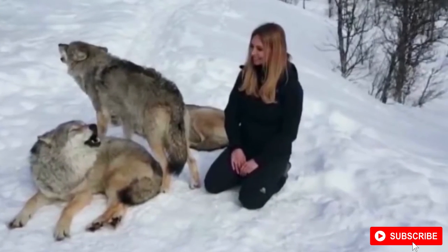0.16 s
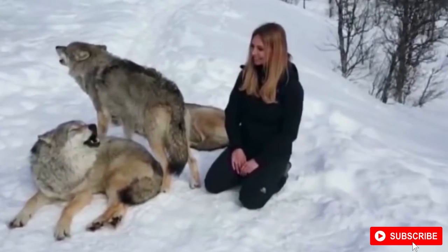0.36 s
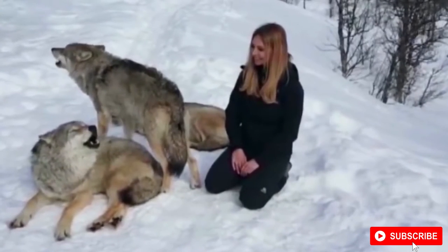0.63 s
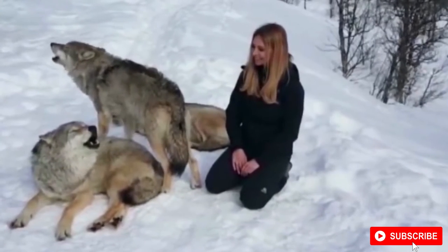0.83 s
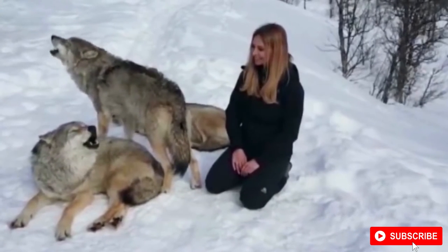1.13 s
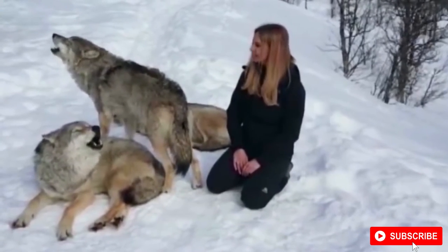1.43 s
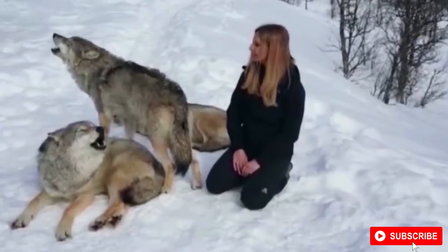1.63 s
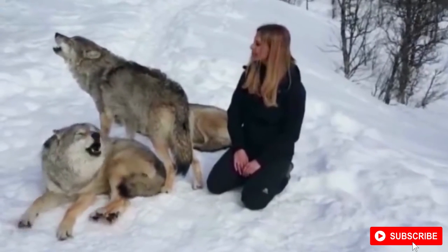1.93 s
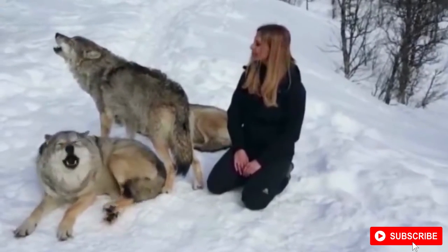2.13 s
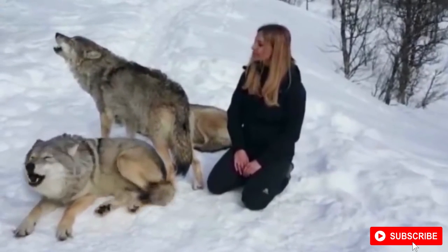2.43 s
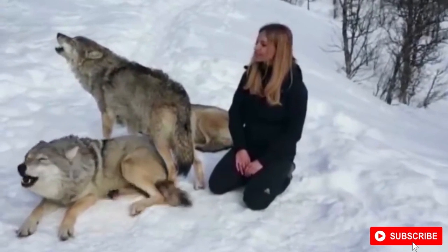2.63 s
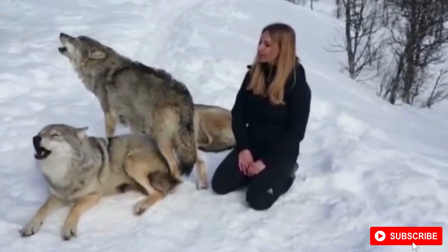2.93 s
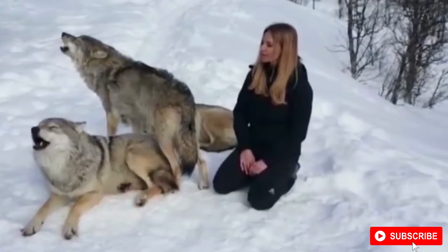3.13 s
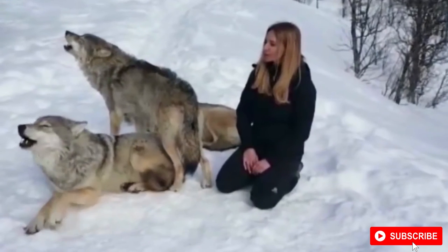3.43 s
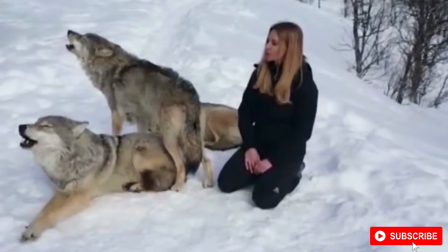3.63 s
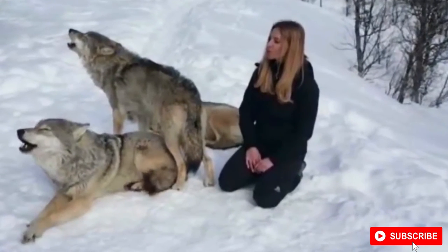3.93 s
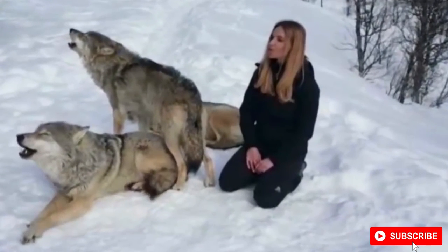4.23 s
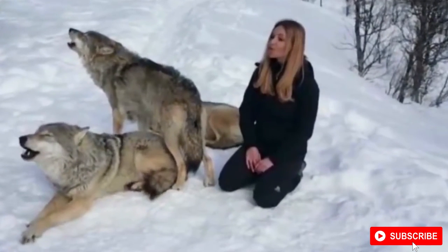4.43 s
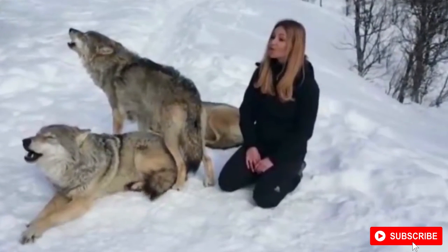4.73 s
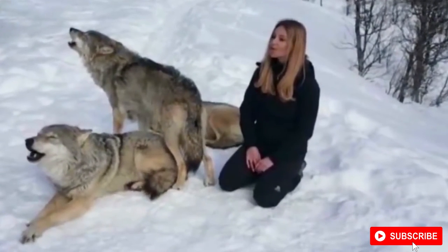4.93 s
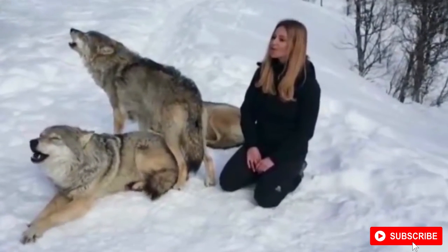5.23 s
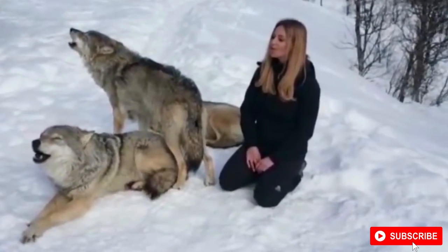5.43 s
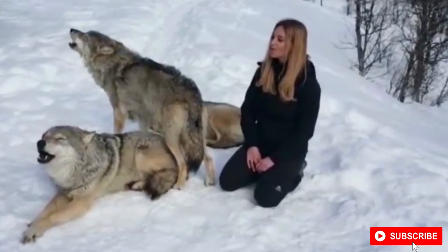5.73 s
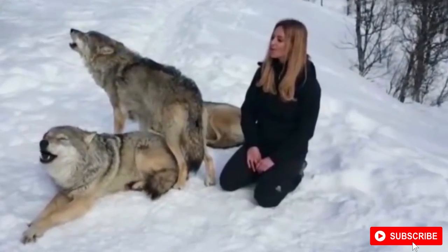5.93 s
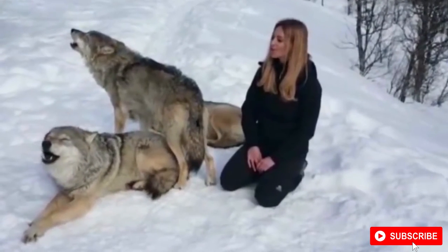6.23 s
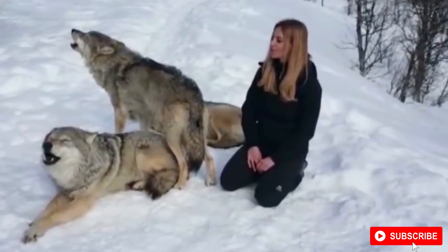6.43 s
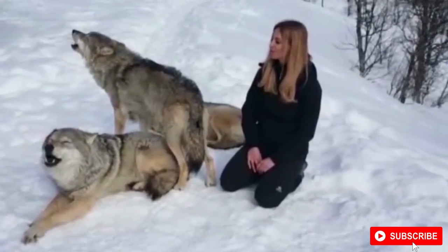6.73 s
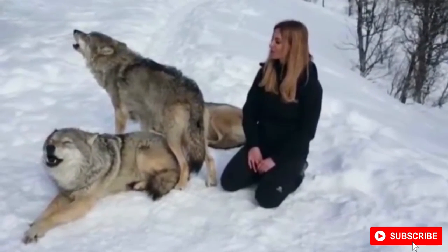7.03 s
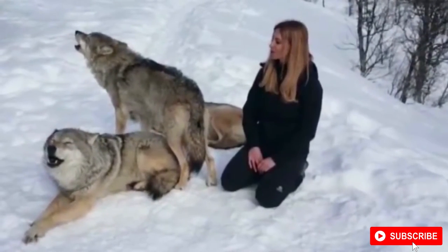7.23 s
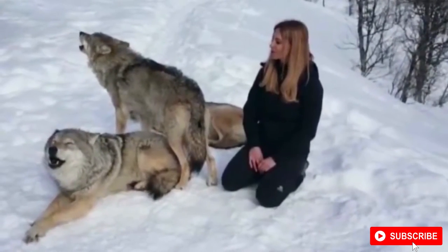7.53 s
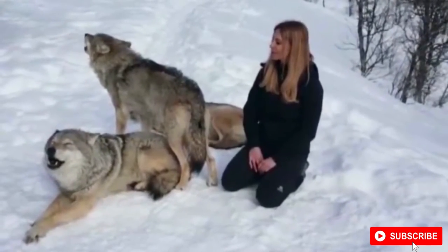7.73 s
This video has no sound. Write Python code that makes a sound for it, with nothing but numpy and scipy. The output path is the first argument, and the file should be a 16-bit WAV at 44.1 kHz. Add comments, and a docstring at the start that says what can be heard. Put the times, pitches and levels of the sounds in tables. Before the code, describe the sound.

Outdoor wolf chorus, close and slightly to the left. A thin whine opens, followed by a yelp and a long ringing howl sliding from high to low. Beneath it another wolf holds a smooth, flute-like note, while a third yowls up and down in a weak, raspy voice. Their notes beat where they meet. Quiet open air, light low wind bumps, and only a slight tail.

```python
"""Open snow near trees: three wolves howl together, a few metres from the microphone.
One whimpers, yelps and sinks through a long ringing howl; one holds a round, almost pure note;
a hoarse one yowls up and down. Each voice is a stack of overtones shaped by throat, mouth and muzzle,
with breath noise gated by the vocal folds. The tones beat where they meet; the trees give back
a faint, dull tail, and light air brushes the microphone."""
import sys
import numpy as np
from scipy import signal
from scipy.fft import rfft, irfft
from scipy.io import wavfile
from scipy.ndimage import uniform_filter1d

SR = 44100
rng = np.random.default_rng(int(sys.argv[2]) if len(sys.argv) > 2 else 0)


def generate_wav(sig):
    """Save sig (samples, or channels by samples) to the path in sys.argv[1] as 16-bit PCM at SR."""
    pcm = np.round(np.clip(np.atleast_2d(sig).T, -1, 1) * 32767).astype(np.int16)
    wavfile.write(sys.argv[1], SR, pcm)


N = 347067
TIME = np.arange(N) / SR
BINS = np.fft.rfftfreq(N, 1 / SR)


def gain_of(db):
    """Decibels to amplitude."""
    return 10 ** (np.asarray(db) / 20)


def evened(x):
    """Scales to rms 1."""
    return x / np.sqrt(np.mean(x ** 2) + 1e-20)


def read(points, hz):
    """Reads a spectrum on a log-frequency axis."""
    f, value = np.transpose(points)
    return np.interp(np.log(hz + 1), np.log(f + 1), value)


def shaped(x, gain):
    """Filters by one gain for each frequency bin."""
    return irfft(rfft(x) * gain, N)


def wander(hz):
    """Smooth random drift of rms 1, up to about this rate."""
    return evened(shaped(rng.standard_normal(N), 1 / (1 + (BINS / hz) ** 2)))


def traced(rows):
    """Joins the points of a gesture by straight lines: its times, then each control."""
    s, *columns = np.transpose(rows)
    t = np.arange(s[0], s[-1], .002)
    return [t] + [np.interp(t, s, c) for c in columns]


def overtone(k, hz, phase, level_db, treble_db, mouth_db, press_db, throat, muzzle, muzzle_db, sway_db):
    """One multiple of the folds' pitch, as loud as throat, mouth and muzzle let it through."""
    slow = np.arange(0, N, 64)  # loudness is worked out every 64 samples
    f = k * hz[slow]
    mouth = np.exp(-(np.log(f / 740) / 0.23) ** 2)
    upper = read([(450, 0), (1300, 1)], f)
    low_db = level_db[slow] + read(throat, f) + mouth * mouth_db[slow] + upper * press_db[slow]
    low = gain_of(low_db) / (1 + (f / 2900) ** 30)
    high = gain_of(treble_db[slow] + muzzle_db + read(muzzle, f)) * (f < muzzle[-1][0])
    # each high overtone swells and fades on its own as the head moves
    sway = uniform_filter1d(rng.standard_normal(len(f)), size=70)
    sway = evened(uniform_filter1d(sway, size=40))
    size = (low + high) * gain_of(sway_db * sway * np.minimum(f / 3000, 1))
    return np.interp(TIME, TIME[slow], size) * np.cos(k * phase + np.pi * rng.random())


def breath(phase, throat, muzzle):
    """Turbulence gated once a cycle: a low rasp through the throat and a hiss through the muzzle."""
    gated = rng.standard_normal(N) * (1 + np.cos(phase))
    low_cut = BINS ** 2 / (BINS ** 2 + 500 ** 2)
    rasp = shaped(gated, gain_of(read(throat, BINS)) / (1 + (BINS / 2900) ** 8) * low_cut)
    hiss = shaped(gated, gain_of(read(muzzle, BINS)) * (BINS < muzzle[-1][0]))
    return evened(rasp), evened(hiss)


def wolf(rows, throat, muzzle, rough, muzzle_db, rasp_db, hiss_db, edge=1, doubling=0,
         jitter=.022, shimmer=.2, sway_db=2.0, falsetto_db=15, count=30):
    """Vocal folds with an unsteady period sound through throat, mouth and muzzle; air rasps at each opening."""
    s, *columns = np.transpose(rows)
    hz, level_db, mouth_db, press_db = (uniform_filter1d(np.interp(TIME, s, c), size=600) for c in columns)
    voiced = uniform_filter1d(1. * ((TIME >= s[0]) & (TIME <= s[-1])), size=700)
    pitch = hz * (1 + .003 * wander(18) + jitter * rough * wander(110))
    phase = 2 * np.pi * np.cumsum(pitch) / SR
    # pressing sharpens the closing of the folds; on high notes they close softly and lose their treble
    treble_db = level_db + edge * press_db - falsetto_db * np.maximum(np.log2(hz / 430), 0)
    voice = np.zeros(N)
    for k in range(1, count):
        tone = overtone(k, hz, phase, level_db, treble_db, mouth_db, press_db,
                        throat, muzzle, muzzle_db, sway_db)
        # strong and weak beats of the folds put half lines around the second overtone
        half_lines = doubling * np.cos(phase / 2) if k == 2 else 0
        voice += tone * (1 + half_lines)
    voice *= 1 + shimmer * rough * wander(51)
    rasp, hiss = breath(phase, throat, muzzle)
    rasp = gain_of(level_db + press_db + rasp_db) * rough * rasp
    return voiced * (voice + rasp + gain_of(treble_db + hiss_db) * hiss)


# the lead wolf's faint opening whine: (time [s], pitch [Hz])
WHINE = [(0, 690), (.03, 727), (.115, 688), (.16, 813.6), (.195, 757), (.235, 824), (.305, 781), (.35, 512)]


def whine(level_db=-22, mouth_db=-1.5, press_db=3):
    """A thin whimper before the call: pitch bends while level, mouth and overtone lift stay even."""
    t, hz = traced(WHINE)
    return np.column_stack(np.broadcast_arrays(t, hz, level_db, mouth_db, press_db))


# one call in three stretches, a yelp, a high howl, a break into a long low howl: (time [s], pitch [Hz])
YELP = [(.85, 697), (.875, 681), (.905, 740), (.97, 635.5), (1.0, 689), (1.03, 912), (1.075, 1003),
        (1.11, 924), (1.145, 685)]
HIGH_HOWL = [(1.217, 634), (1.29, 675), (1.39, 685), (1.54, 656), (1.62, 631.4), (1.8, 535.6), (1.84, 476),
             (2.2, 431), (2.44, 427.3), (2.52, 433), (2.66, 430), (2.909, 403.6)]
LOW_HOWL = [(2.95, 368.9), (3.7, 361.2), (3.88, 351), (4.33, 341.6), (4.58, 337.6), (4.85, 366.8),
            (5.77, 333.2), (5.92, 339.9), (6.04, 326.8), (6.23, 328.3), (6.41, 319.5), (6.71, 298.8),
            (6.89, 305.1), (7.18, 290.3), (7.3, 277.3), (7.42, 242), (7.48, 242.2), (7.59, 264),
            (7.79, 220.8), (7.86, 220.9)]
# how the lead wolf's voice follows its pitch:
# (pitch [Hz], level [dB], lift of the mouth resonance [dB], lift of the overtones by a pressed voice [dB])
REGISTERS = [(217, -18.5, -14, -16.5), (234, -15.5, -8, -26), (263, -15.5, -1, -24), (300, -15, -9, -16),
             (332.9, -19, 0.5, -5), (360.2, -18, 5, 3), (403, -17, 8.5, -3), (422, -11.5, -4, 5),
             (430, -9.5, -10, -2), (476, -2, 0, -15.5), (570, -11, -2, 5.5), (610, -14, -4, 7),
             (720, -10.5, -14, 8), (833, -8.5, -11, 5), (1042, -2.5, 2, 10.5)]


def lead_call():
    """Pitch alone sets how loud, open and pressed the lead wolf sings; it holds its last note."""
    last_note = (TIME[-1], LOW_HOWL[-1][1])
    t, hz = traced([*YELP, *HIGH_HOWL, *LOW_HOWL, last_note])
    register_hz, *voice = np.transpose(REGISTERS)
    return np.column_stack([t, hz] + [np.interp(hz, register_hz, c) for c in voice])


# colour of the lead wolf's throat: (frequency [Hz], level [dB])
LEAD_THROAT = [(220, -36), (300, -28), (400, 1.5), (520, -11.5), (740, -3), (950, -15), (1300, -17.5),
               (1580, -20.5), (1760, -21), (1860, -21.5), (2200, -56.5), (2500, -42.5), (2700, -56),
               (2900, -58.5)]
# high resonances of its muzzle: (frequency [Hz], level [dB])
LEAD_MUZZLE = [(2900, -4.5), (4100, -16), (4600, -17), (5250, 3.5), (5750, -13.5), (6250, 4.5), (7100, -13),
               (8400, -16), (9500, -26)]
# it rasps most in its high howl, then eases: (time [s], roughness [0-1])
LEAD_HOARSE = [(1.102, 0.11), (1.499, 0.21), (1.849, 0.14), (3.599, 0.11), (4.201, .16), (4.799, 0.12)]


def lead_wolf():
    """The ringing voice: whine and call from one throat, losing treble strongly on high notes."""
    rough = np.interp(TIME, *np.transpose(LEAD_HOARSE))
    return sum(wolf(call, LEAD_THROAT, LEAD_MUZZLE, rough=rough, muzzle_db=-54.5, rasp_db=-18.5,
                    hiss_db=-51, sway_db=4.5, falsetto_db=21.5) for call in (whine(), lead_call()))


# the round howl: (time [s], pitch [Hz], level [dB], lift of the overtones [dB])
ROUND_HOWL = [(.84, 225, -30.5, -8.5), (.9, 310.6, -26, -13), (.98, 383.2, -16, -22),
              (1.08, 393, -13.5, -22.5), (1.18, 431.5, -10, 4.5), (1.29, 495.7, -14, -18),
              (1.52, 475, -13, 8.5), (1.58, 426, -10, 5.5), (1.8, 408.8, -13, -13.5),
              (2.27, 403.2, -15, -1), (2.55, 396, -15, 0.5), (2.95, 394, -14, -10), (3.45, 397, -14.5, -5),
              (4.1, 380, -16, -11.5), (4.7, 385.5, -15.5, -10.5), (5.1, 378.3, -16.5, -25.5),
              (5.25, 390.3, -16.5, -19), (5.8, 373.2, -19.5, -26), (5.95, 333.1, -28.5, -6.5),
              (6.34, 340.4, -29.5, -10)]


def round_call(mouth_db=-14, db_per_octave=46.5, held_hz=370, relax=1):
    """The mouth opens above the held note, and its resonance stands out as the voice relaxes."""
    t, hz, level_db, press_db = traced(ROUND_HOWL)
    opening_db = db_per_octave * np.maximum(np.log2(hz / held_hz), 0)
    # relax: dB gained by the mouth for each dB that the overtones lose
    mouth_db = mouth_db + opening_db - relax * press_db
    return np.column_stack([t, hz, level_db, mouth_db, press_db])


# colour of the round howler's throat: (frequency [Hz], level [dB])
ROUND_THROAT = [(220, -4), (300, -12), (400, -.5), (520, -8.5), (740, -12), (950, -31), (1300, -15),
                (1600, -42), (1900, -40), (2400, -69)]
# high resonances of the muzzle, for the round howler and the yowler: (frequency [Hz], level [dB])
MUZZLE = [(2950, -20), (3500, 3), (4100, -17.5), (5150, -10.5), (5500, 7), (5950, -16), (6600, 1.5),
          (7400, -6.5), (8500, -16.5), (9500, -29.5)]


def round_wolf():
    """The almost pure voice: steady, slight roughness and a weak muzzle."""
    return wolf(round_call(), ROUND_THROAT, MUZZLE, rough=0.14, muzzle_db=-70.5, rasp_db=-27.5, hiss_db=-59.5)


# the note that the yowler keeps returning to: (time [s], pitch [Hz], level [dB], lift of the overtones [dB])
YOWL = [(0, 259.8, -30, -3.5), (.1, 233, -33, 4.5), (.3, 239.9, -30.5, -3), (.37, 249.2, -26.5, -1),
        (.6, 247, -27.5, -4.5), (.85, 276.8, -30, -1.5), (1.3, 258, -28.5, 2.5), (1.88, 262.4, -27, -3.5),
        (2.13, 283.1, -29, 4.5), (2.65, 264.3, -26, -6), (3.25, 231.3, -32, -13), (3.6, 230, -37.5, -23.5),
        (4.03, 267.4, -30.5, -11), (4.3, 288, -33, -11), (4.6, 313.5, -36.5, -3.5), (4.9, 347.9, -32.5, -6),
        (5.26, 327.1, -36.5, -12.5), (5.4, 338, -38.5, -10), (5.81, 317, -35, -14), (6.15, 299, -38, -7),
        (6.54, 338.6, -31.5, -25), (6.85, 325, -33, -18.5), (7.15, 345, -32, -24.5),
        (7.87, 358.3, -33.5, -25)]
# its upward cries: (time of the top [s], rise [s], fall [s], top pitch [Hz],
# lift of the level [dB], lift of the overtones [dB])
CRIES = [(0.208, .03, .03, 264, 4, -3.5), (.645, .025, 0.079, 338, -8, 12.5),
         (.715, .04, .07, 325, -6, 12.5), (1.168, .04, .055, 366, -8.5, 10.5),
         (1.47, .085, .065, 420, -5, 15.5), (1.465, .015, .02, 552, 19, -7.5),
         (1.69, .025, .04, 289, 3.5, -4.5), (1.772, 0.035, 0.045, 276.6, 1, 6),
         (1.959, 0.036, .05, 292, -2.5, 8.5), (2.028, 0.044, 0.047, 300, -2.5, 6.5),
         (2.2, .04, .045, 388, -1, 5), (2.28, 0.049, .06, 367, -3.5, 9.5), (2.39, .04, .08, 317, -2.5, 7.5),
         (2.84, .095, .14, 398, -16, -5.5), (2.99, .1, 0.089, 371.2, -10.5, -2.5),
         (3.158, .04, .045, 319, -6.5, 5.5), (3.869, .035, .065, 338, -6, 11),
         (4.41, .035, .1, 388, 6.5, -2), (4.49, .07, .035, 384, 9.5, -5), (4.68, .04, .09, 358, 6.5, -12),
         (4.86, .03, .04, 379, 8, -10), (5.886, .04, 0.053, 371, 4, 7), (7.55, .03, 0.032, 384, 3.5, -5.5)]


def yowl_call(mouth_db=4, relax=0.053):
    """Each cry is a bell-shaped swoop of pitch and effort from the resting note and back."""
    t, rest_hz, level_db, press_db = traced(YOWL)
    s, rise, fall, top_hz, louder_db, harder_db = np.transpose(CRIES)[:, :, None]
    bell = np.exp(-((t - s) / np.where(t < s, rise, fall)) ** 2)
    hz = rest_hz + (bell * (top_hz - rest_hz)).max(axis=0)
    # overlapping cries share the effort
    share = bell / np.maximum(bell.sum(axis=0), 1)
    level_db = level_db + (share * louder_db).sum(axis=0)
    press_db = press_db + (share * harder_db).sum(axis=0)
    return np.column_stack([t, hz, level_db, mouth_db - relax * press_db, press_db])


# colour of the yowler's throat: (frequency [Hz], level [dB])
YOWL_THROAT = [(220, -9), (300, -12.5), (400, 8), (520, -4.5), (740, 10.5), (950, -10.5), (1280, -3.5),
               (1530, -26.5), (1770, -8), (2000, -25.5), (2170, -15.5), (2400, -35.5), (2620, -22.5),
               (2900, -63)]
# its hoarseness, with one break of the voice: (time [s], roughness [0-1])
HOARSE = [(0, .055), (.8, 0.1), (.9, .15), (1.3, .07), (1.47, .33), (1.65, .12), (2.05, .11), (2.2, .17),
          (2.55, .07), (3.5, .05), (3.65, 0.4), (3.8, 0.8), (3.95, .2), (4.3, .1), (4.45, .15), (4.7, .055)]
# its folds fall into strong and weak beats: (time [s], depth [0-1])
DOUBLING = [(6.122, 0), (6.2, 1), (6.3, 0.7), (6.35, 0)]


def yowl_wolf():
    """The hoarse voice: shaky pitch and level, strong rasp, and a moment of doubled folds."""
    hoarse = np.interp(TIME, *np.transpose(HOARSE))
    doubling = np.interp(TIME, *np.transpose(DOUBLING))
    return wolf(yowl_call(), YOWL_THROAT, MUZZLE, rough=hoarse, muzzle_db=-44.5, jitter=.06, shimmer=.5,
                rasp_db=-3.5, hiss_db=-40, edge=0.83, doubling=doubling, sway_db=5)


def ports(x, pan_db, bright_db=5.5):
    """The wolves are to the left: their voices reach the left port earlier and a little brighter."""
    # phase lead of the left port: (frequency [Hz], lead [radians])
    lead = read([(50, 0), (400, .27), (750, .33), (1050, .5),
                 (1380, 1.5), (2500, 1.4), (6000, 1.1), (8000, .6)], BINS)
    left_db = pan_db + bright_db * BINS / (BINS + 1000)  # left port over right
    turn = np.exp(.5j * lead) * gain_of(left_db / 2)
    return np.array([shaped(x, turn), shaped(x, 1 / turn)])


def trees(x, t60=1.0, dull_hz=2500):
    """Trunks and the slope scatter a thin, dull tail to each port."""
    t = TIME[:SR]
    hits = rng.standard_normal((2, SR)) * (rng.random((2, SR)) < .04)
    taps = hits * gain_of(-60 * t / t60) * (t > .012)
    dull = signal.butter(1, dull_hz, fs=SR, output="sos")
    tail = signal.sosfilt(dull, taps / np.linalg.norm(taps[0]))
    return signal.fftconvolve(x[None], tail, axes=1)[:, :N]


# puffs of air on the microphone: (time [s], level [dB], length [s])
PUFFS = [(0.177, -40, 0.1), (0.472, -45, 0.2), (0.875, -52.5, 0.29), (1.459, -49.5, 0.33),
         (1.916, -33, 0.059), (2.255, -47, 0.22), (2.877, -43, 0.094), (3.227, -46.5, 0.24),
         (4.41, -46, 0.13), (5.1, -59.5, 0.1), (6.66, -55.5, 0.15)]


def breeze(top_hz=120, calm_db=-79, right_db=-13):
    """Low puffs of turbulence, mostly on the windward left port."""
    puffs = sum(gain_of(db) * np.exp(-(2 * (TIME - s) / length) ** 2) for s, db, length in PUFFS)
    strength = gain_of(calm_db) + puffs
    band = BINS ** 2 / (BINS ** 2 + 40 ** 2) / (1 + (BINS / top_hz) ** 4)
    rumble = evened(shaped(rng.standard_normal((2, N)), band))
    return rumble * strength * gain_of([[0], [right_db]])


# colour of the quiet background: (frequency [Hz], relative density [dB per Hz])
AIR = [(30, 7.5), (120, -14), (250, -15.5), (900, -20), (2000, -9.5), (4000, -25.5), (10000, -27),
       (15000, -26)]


def air(level_db=-66):
    """A steady hush of shaped noise, largely shared by both ports."""
    noise = rng.standard_normal(N) + .5 * rng.standard_normal((2, N))
    return gain_of(level_db) * evened(shaped(noise, gain_of(read(AIR, BINS))))


def scene():
    """The three voices side by side, their tail, and the open air."""
    lead, held, yowl = lead_wolf(), round_wolf(), yowl_wolf()
    direct = ports(lead, pan_db=-2.4) + ports(held, pan_db=-1.5) + ports(yowl, pan_db=-2.0)
    return direct + gain_of(-21.5) * trees(lead + held + yowl) + breeze() + air()


def record(dry, edge_hz=15750):
    """The microphone's band limit: a steep low-pass."""
    low_pass = signal.firwin(511, edge_hz, window=("kaiser", 9), fs=SR)
    return signal.oaconvolve(dry, low_pass[None], "same")


dry = scene()
out = record(dry)
generate_wav(out)
```